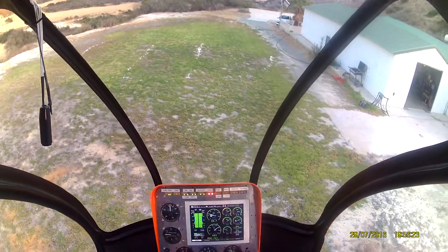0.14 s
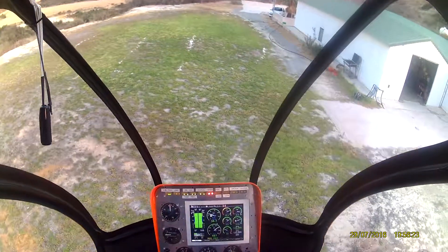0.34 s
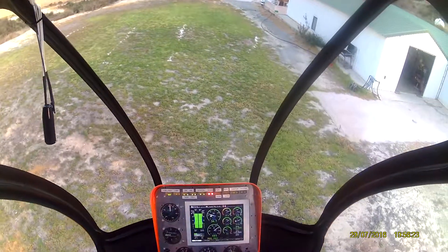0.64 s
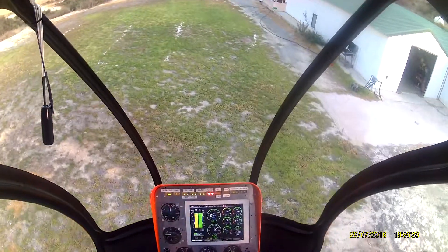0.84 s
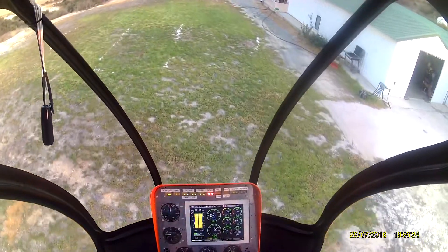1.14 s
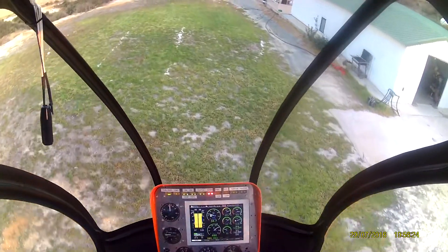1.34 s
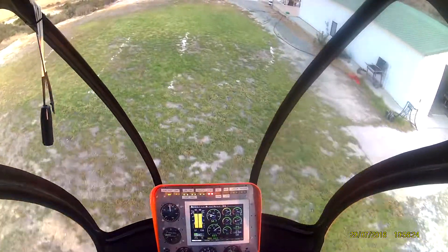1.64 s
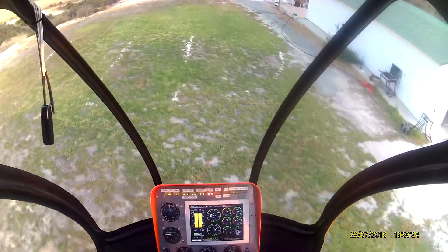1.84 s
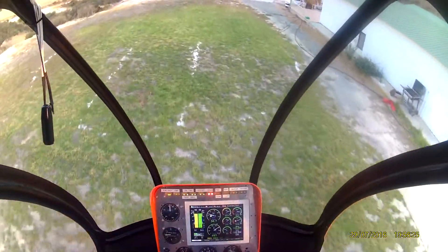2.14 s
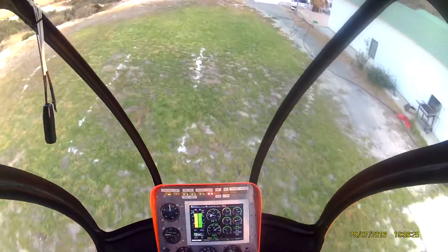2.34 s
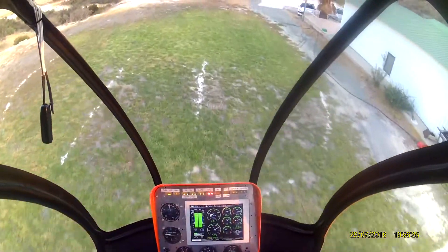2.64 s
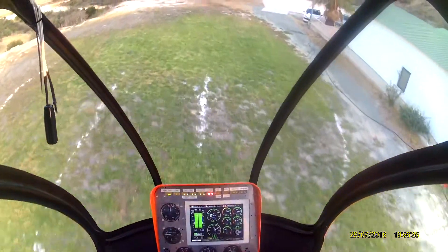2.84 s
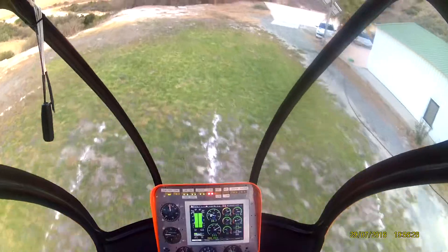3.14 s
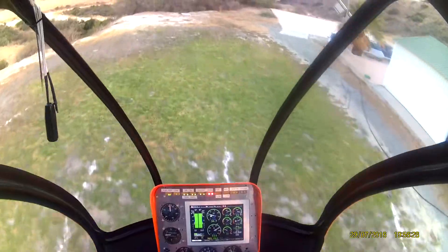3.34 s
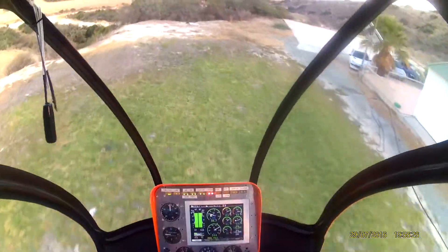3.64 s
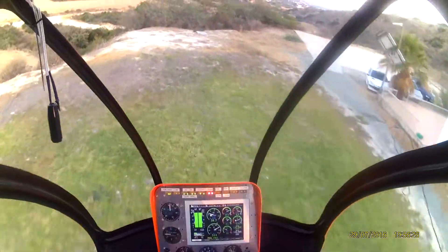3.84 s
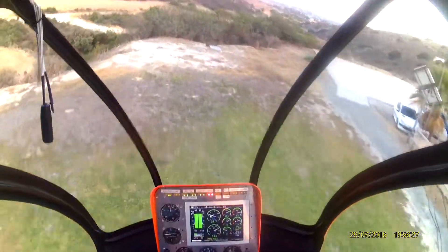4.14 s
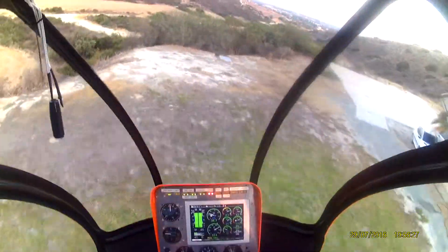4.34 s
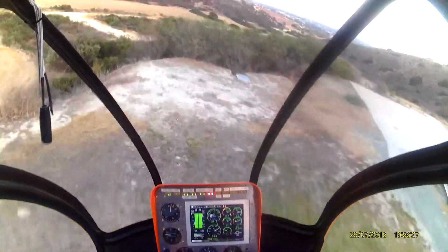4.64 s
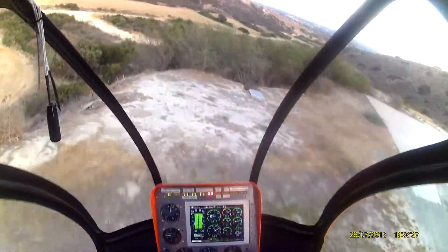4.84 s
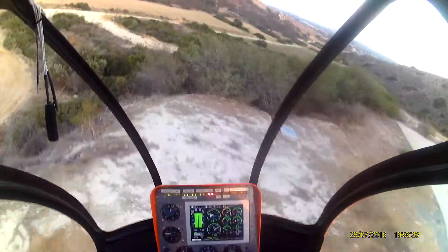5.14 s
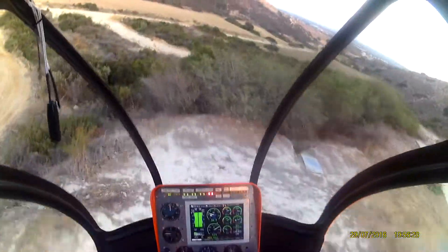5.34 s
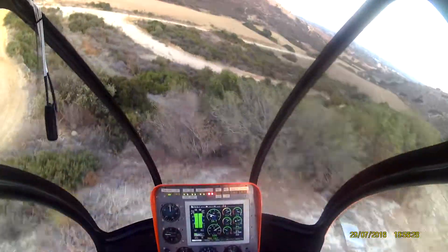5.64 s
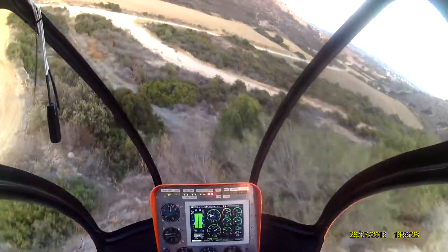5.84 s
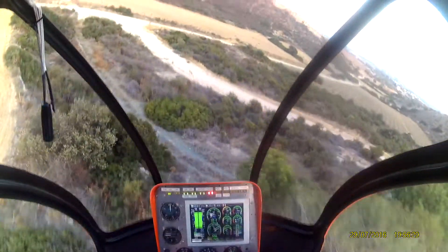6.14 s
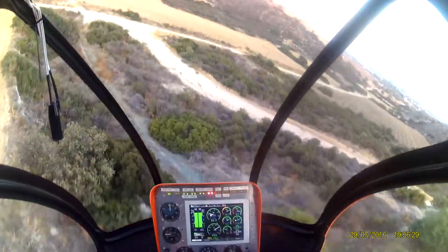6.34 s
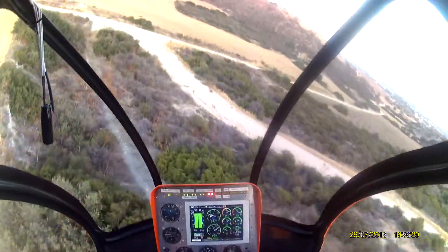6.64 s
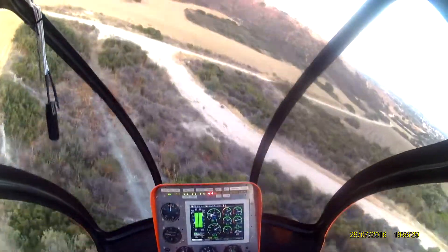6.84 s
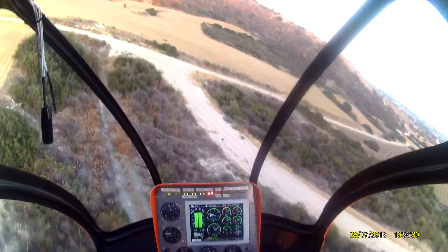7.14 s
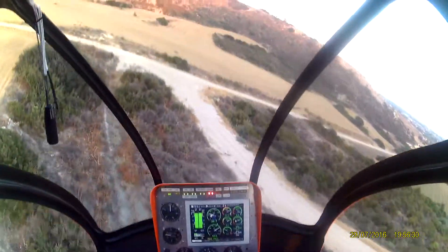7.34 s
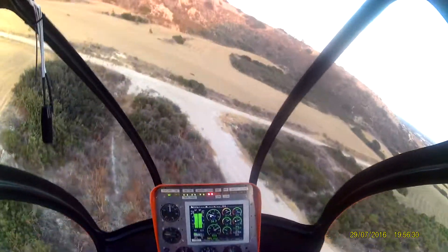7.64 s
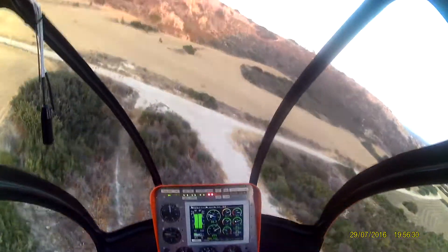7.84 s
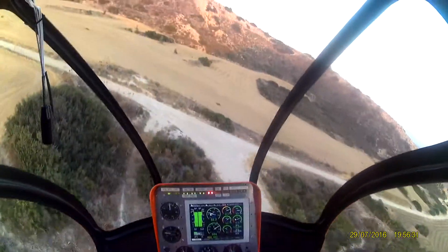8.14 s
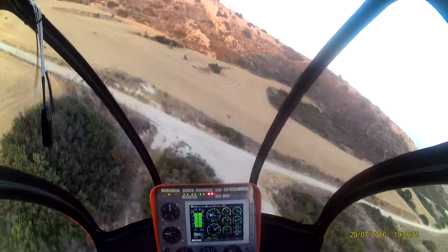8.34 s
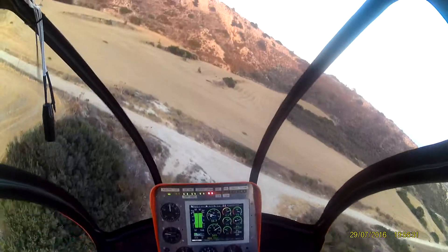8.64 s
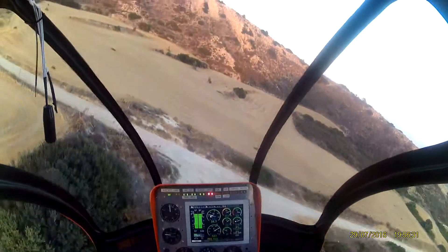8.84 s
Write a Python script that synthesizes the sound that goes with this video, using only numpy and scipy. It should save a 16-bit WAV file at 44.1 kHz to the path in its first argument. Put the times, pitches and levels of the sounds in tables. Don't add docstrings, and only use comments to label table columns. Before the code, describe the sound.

Inside a small turbine helicopter, a piercing gearbox whine sags and recovers over low rumble, then blades beat harder, everything harshly overloaded.

```python
import sys
import numpy as np
from scipy import signal
from scipy.fft import rfft, irfft, next_fast_len
from scipy.io import wavfile
from scipy.ndimage import uniform_filter1d, map_coordinates

SR = 44100
rng = np.random.default_rng(int(sys.argv[2]) if len(sys.argv) > 2 else 0)


def inscribe(sig):
    pcm = np.round(np.clip(np.atleast_2d(sig).T, -1, 1) * 32767)
    wavfile.write(sys.argv[1], SR, pcm.astype(np.int16))


def gain_from_decibels(decibels):
    exponent = np.asarray(decibels, float) / 20
    return 10 ** exponent


N = 396459

MAIN_BLADE, TAIL_BLADE = .01228, .05769
# [t/s, rotor loading/0-1]
LOADING = [
    (0, 0.15),
    (1, 0.2),
    (2.2, 0.1),
    (2.7, 0.16),
    (3.6, 0.76),
    (4.4, 0.98),
    (5.2, 0.95),
    (5.7, 0.83),
    (7.5, 1),
    (9, 0.76),
]
# [t/s, bank/0-1]
BANK = [
    (0, 0.36),
    (4.8, 0.01),
    (6.7, 0.94),
    (9, 1),
]


def unit(x):
    return x / np.sqrt(np.mean(x ** 2) + 1e-20)


def curves(rows):
    s, *cols = np.transpose(rows)
    return [np.interp(np.arange(N) / SR, s, c) for c in cols]


def wobble(rate):
    knots = rng.standard_normal(int(N * rate / SR) + 4)
    return map_coordinates(knots, [np.arange(N) * rate / SR], order=1)


def filtered(x, response):
    m = next_fast_len(N + SR // 2)
    spectrum = rfft(x, m) * response(np.fft.rfftfreq(m, 1 / SR))
    return irfft(spectrum, m)[..., :N]


def tone(turn, db, waver_db, rate, free=True):
    start = free * rng.uniform(0, 2 * np.pi)
    strength = np.sqrt(2) * gain_from_decibels(db + waver_db * wobble(rate))
    return strength * np.sin(turn + start)


def orders(turn, multiples, levels, waver_db):
    return sum(tone(k * turn, db, waver_db, rate=1.99) for k, db in zip(multiples, levels))


def loaded_db(hover_db, gain_db):
    return hover_db + gain_db * curves(LOADING)[0]


def case_db(mesh_hz, best, width, peak_db, far_db):
    nominal_hz = 1480
    bell_db = peak_db - 3 * ((mesh_hz - nominal_hz - best) / width) ** 2
    return 20 * np.log10(np.hypot(gain_from_decibels(bell_db), gain_from_decibels(far_db)))


def drivetrain():
    # [t/s, main mesh f/Hz]
    speed = [(0, 1484), (.15, 1482.7), (.6, 1468), (.85, 1463.5), (1.1, 1463), (1.6, 1466.5), (2.4, 1479.5),
             (3.2, 1487.6), (3.9, 1494.4), (4.4, 1496.2), (5, 1497.1), (6, 1494.6), (6.8, 1486.5),
             (7.6, 1484.5), (8.5, 1481.3), (9, 1481.4)]
    mesh_hz = uniform_filter1d(curves(speed)[0], size=8820)
    turn = 2 * np.pi * np.cumsum(mesh_hz) / SR
    bank, = curves(BANK)
    rotors = main_rotor(turn, bank) + tail_rotor(turn, bank)
    return gearbox(turn, mesh_hz, bank) + engine_shaft(turn) + rotors + pumps(turn)


def gearbox(turn, mesh_hz, bank):
    lay_orders = (2, 3, 6, 7, 9, 10, 11, 12, 15, 17, 18, 19, 21, 23, 31, 32, 33, 36, 38, 40, 41, 42, 43, 44,
                  48)
    lay_levels = (-30.5, -42, -32, -35.5, -32.5, -52, -40, -42.5, -45, -35.5, -42, -41.5, -43.5, -44, -63,
                  -42, -38, -45, -32, -35, -40, -33, -35, -35, -36.5)
    lay = turn / 39
    first_db = case_db(mesh_hz, best=15, width=21.5, peak_db=-14.5, far_db=-35)
    second_db = case_db(mesh_hz, best=-18, width=16.5, peak_db=-16, far_db=-49)
    third_db = case_db(mesh_hz, best=13, width=6.5, peak_db=-25, far_db=-32)
    near_db = case_db(mesh_hz, best=-12, width=20, peak_db=-24.5, far_db=-40)
    first = tone(turn, first_db, waver_db=0.34, rate=6.8, free=False)
    second = tone(45 * lay, second_db, waver_db=.6, rate=6)
    third = tone(34 * lay, third_db, waver_db=1.2, rate=5)
    near = tone(37 * lay, near_db - 1.5, waver_db=1.1, rate=5)

    over2_db = case_db(mesh_hz, best=-12.5, width=-1.5, peak_db=-32.5, far_db=-34) - 5.5 * bank
    over3_db = case_db(mesh_hz, best=7, width=6, peak_db=-45, far_db=-55)
    over4_db = case_db(mesh_hz, best=1, width=9, peak_db=-39.5, far_db=-58)
    over4_db += loaded_db(hover_db=0, gain_db=-6)
    over2 = tone(2 * turn, over2_db, waver_db=0.0, rate=3)
    over3 = tone(3 * turn, over3_db, waver_db=1.1, rate=5, free=False)
    runout = 1 + .55 * np.sin(lay) + .25 * np.cos(2 * lay)
    over4 = runout * tone(4 * turn, over4_db, waver_db=.7, rate=5)

    blade = np.sin(MAIN_BLADE * turn)
    loaded = (1 + 0.049 * blade) * (first + third) + (1 + 0.13 * blade) * second
    return loaded + over2 + over3 + over4 + near + orders(lay, lay_orders, lay_levels, waver_db=1.5)


def engine_shaft(turn):
    shaft_orders = (2, 4, 10, 12, 13, 14, 16, 17, 18)
    shaft_levels = (-45, -39, -40.5, -42, -40, -39, -37, -47, -42.5)
    shaft = turn / 15
    rocking = 1 + 0.24 * np.sin(MAIN_BLADE * turn / 2)
    third_order = tone(3 * shaft, loaded_db(hover_db=-21, gain_db=-4), waver_db=.5, rate=6)
    first_order = tone(shaft, loaded_db(hover_db=-25.5, gain_db=-9), waver_db=2.5, rate=4.3)
    return rocking * third_order + first_order + orders(shaft, shaft_orders, shaft_levels, waver_db=1.2)


def main_rotor(turn, bank):
    beat_orders = (1, 4, 1 / MAIN_BLADE - 2, 1 / MAIN_BLADE - 3)
    beat_levels = (-38.5, -32.5, -45, -41)
    blade = MAIN_BLADE * turn
    beat_db = loaded_db(hover_db=-36, gain_db=18)
    slap_db = -27.5 + .25 * (beat_db + 18) + 4 * bank
    sideband_db = -30 + 0.44 * (beat_db + 21)
    beat = tone(3 * blade, beat_db, waver_db=1.5, rate=5)
    slap = tone(5 * blade, slap_db, waver_db=1.2, rate=2)
    sideband = tone(turn + 3 * blade, sideband_db, waver_db=2.0, rate=1.52)
    return beat + slap + sideband + orders(blade, beat_orders, beat_levels, waver_db=1.5)


def tail_rotor(turn, bank):
    buzz_orders = (2, 3, 6, 1 + 1 / TAIL_BLADE, 1 / TAIL_BLADE - 1)
    buzz_levels = (-37.5, -42.5, -43.5, -31, -33)
    blade = TAIL_BLADE * turn
    beat_db = loaded_db(hover_db=-21.5, gain_db=6.5) - 3 * bank
    beat = tone(blade, beat_db, waver_db=2.3, rate=5)
    return beat + orders(blade, buzz_orders, buzz_levels, waver_db=1.7)


def pumps(turn):
    pump_orders = (.038, .0454, .1661, .1876, .2431, .2577, .6788, .7423, .8297, .8788, .9055, .9576,
                   1.0787, 1.3575)
    pump_levels = (-32.5, -35.5, -34, -34.5, -41, -41, -34.5, -52, -42.5, -34, -31, -45.5, -41, -45.5)
    return orders(turn, pump_orders, pump_levels, waver_db=2.3)


def rush(spectrum, gust_db, rate):
    f, db = np.transpose(spectrum)
    colour = lambda hz: gain_from_decibels(np.interp(np.log(hz + 1), np.log(f), db))
    noise = filtered(rng.standard_normal(N), colour)
    return unit(noise * gain_from_decibels(gust_db * wobble(rate)))


def airflow():
    # [f/Hz, level per Hz/dB]
    rumble_colour = [(20, -120), (35, -36), (55, 4), (70, -4), (88, 9), (105, -1.5), (140, -18),
                     (200, -120)]
    # [f/Hz, level per Hz/dB]
    drone_colour = [(100, -120), (150, -3), (220, -0.5), (300, 7), (400, -1), (520, -13.5), (640, -5.5),
                    (725, 0), (820, -9.5), (950, -6), (1300, -120)]
    # [f/Hz, level per Hz/dB]
    howl_colour = [(800, -120), (1050, -11), (1300, 1.5), (1500, 5), (1700, 3.5), (2000, -9.5),
                   (2600, -16.5), (5000, -23), (9000, -40), (16000, -72), (20000, -120)]
    rumble_db = loaded_db(hover_db=-24, gain_db=3.1) - 2.5
    drone_db = loaded_db(hover_db=-23.5, gain_db=-1.4) - 2.5 * curves(BANK)[0]
    howl_db = loaded_db(hover_db=-23, gain_db=1) - 2.5
    rumble = gain_from_decibels(rumble_db) * rush(rumble_colour, gust_db=1.0, rate=3.8)
    drone = gain_from_decibels(drone_db) * rush(drone_colour, gust_db=1.2, rate=20)
    howl = gain_from_decibels(howl_db) * rush(howl_colour, gust_db=1.6, rate=38)
    return rumble + drone + howl


def scene():
    return (drivetrain() + airflow())[None]


def band_limit(x):
    return signal.sosfilt(signal.butter(12, 15920, fs=SR, output="sos"), x)


def record(dry):
    drive_db, top, knee, give = 0.5, 0.25, 45, 0.013
    hot = gain_from_decibels(drive_db) * dry
    clipped = hot / (1 + np.abs(hot / top) ** knee) ** (1 / knee) + give * hot
    drain_hz, block_hz = 15, 5
    sagged = filtered(clipped, lambda hz: 1j * hz / (drain_hz + 1j * hz) * 1j * hz / (block_hz + 1j * hz))
    hissing = sagged + gain_from_decibels(-64) * rng.standard_normal(N)
    cut = filtered(hissing, lambda hz: np.interp(hz, [15730, 15750, 15850, 15870], [1, .3, .25, 0]))
    return band_limit(cut)


dry = scene()
out = record(dry)
inscribe(out)
```